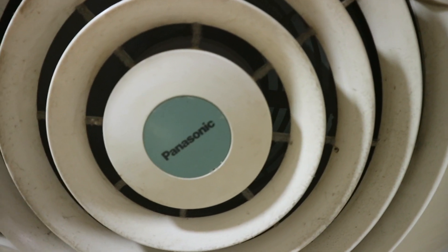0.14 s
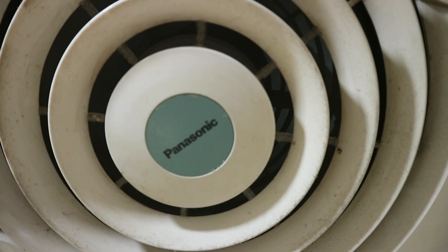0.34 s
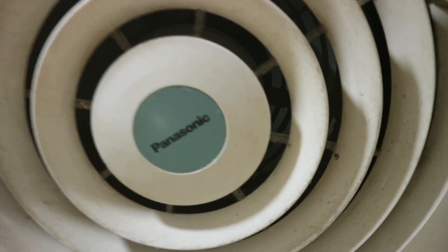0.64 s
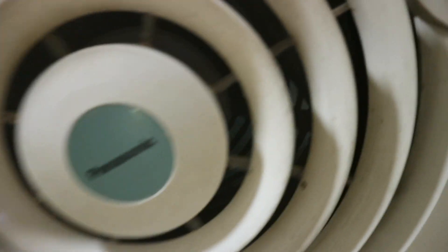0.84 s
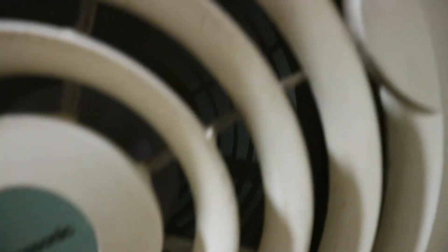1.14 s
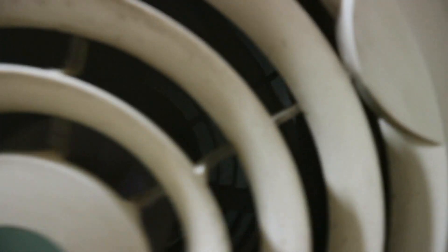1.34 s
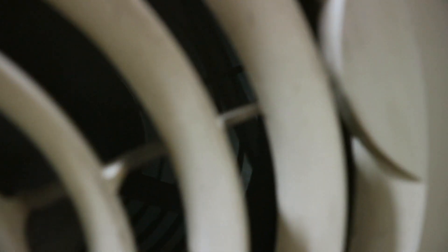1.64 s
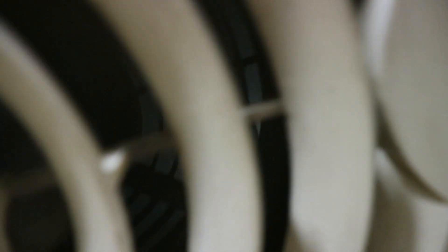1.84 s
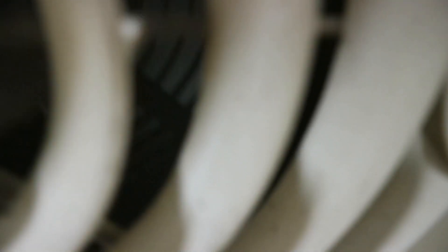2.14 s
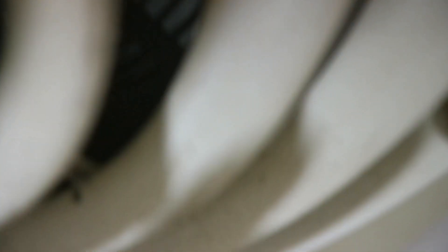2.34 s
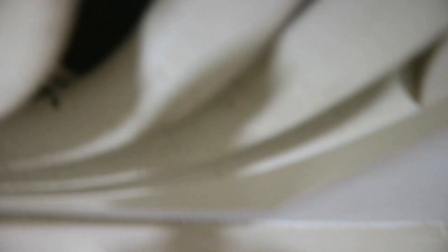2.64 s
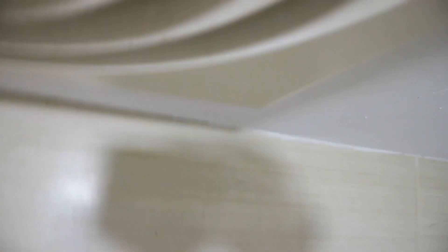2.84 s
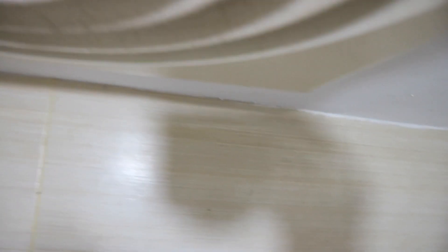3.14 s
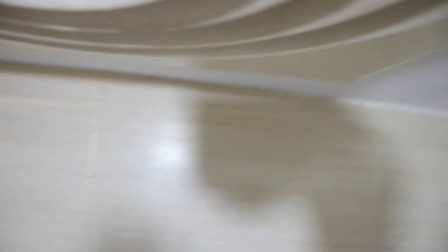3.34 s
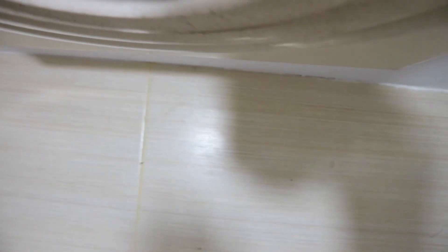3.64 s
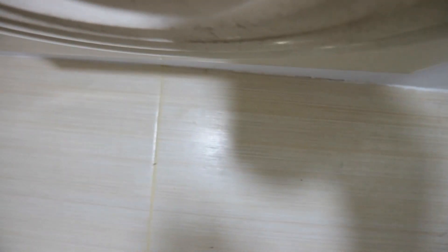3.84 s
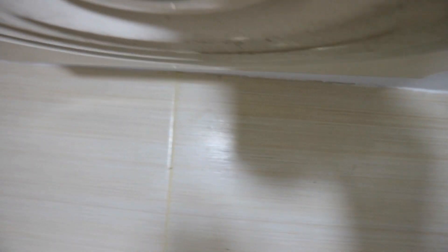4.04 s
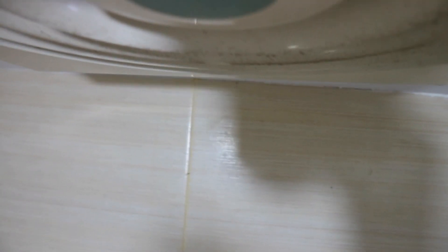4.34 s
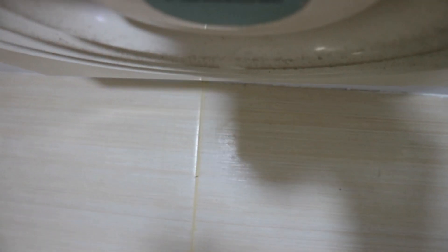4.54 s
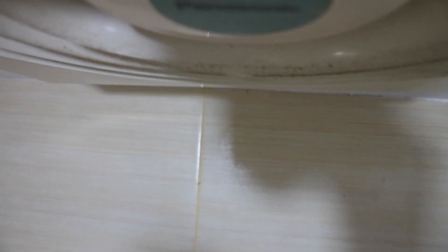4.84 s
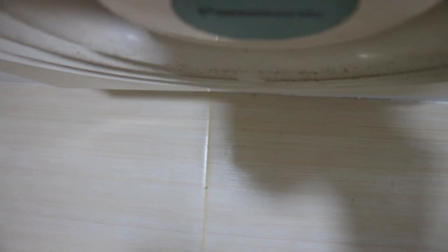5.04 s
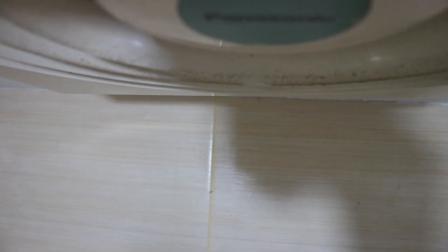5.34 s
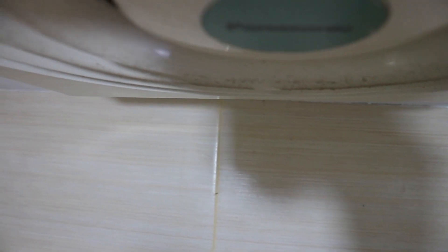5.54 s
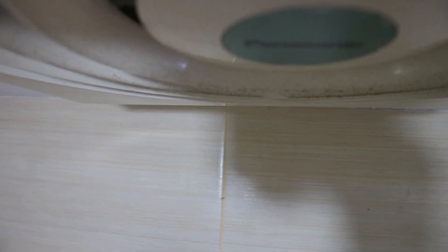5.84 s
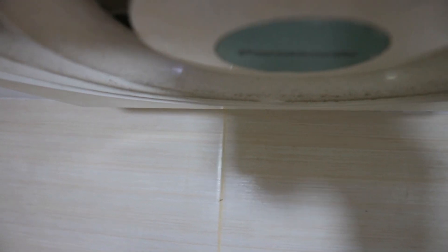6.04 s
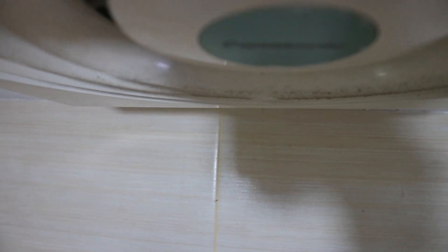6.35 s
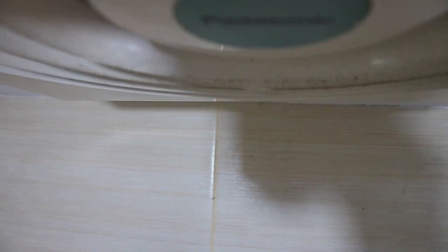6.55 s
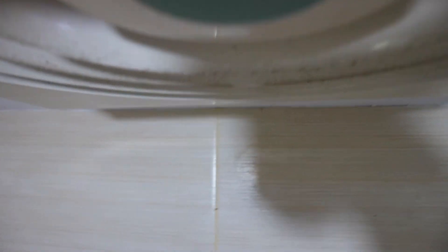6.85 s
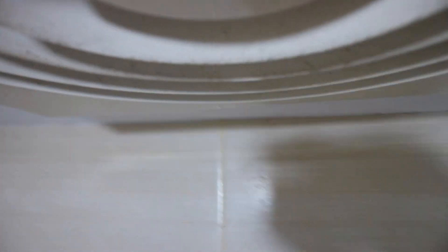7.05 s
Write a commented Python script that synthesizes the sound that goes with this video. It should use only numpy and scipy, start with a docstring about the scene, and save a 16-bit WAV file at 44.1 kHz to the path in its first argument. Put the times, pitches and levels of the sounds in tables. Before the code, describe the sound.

Throbbing motor hum and airy whoosh from a bathroom ventilator, later broken by gusty, bassy draught bumping a moving hand-held microphone.

```python
"""A low hum and drone throb together under rushing air: a ceiling exhaust fan in a tiled bathroom.
The motor hums at twice the mains rate, the impeller drones on multiples of its turning rate,
and noise shaped by the housing makes the air in the grille, a hand's width from a hand-held camera.
Later the microphone slides into the intake draught: eddies, made of short pressure swings, buffet its
two ports. The impeller's third order beats against the hum, and a few faint plastic ticks are heard."""
import sys
import numpy as np
from scipy import signal
from scipy.fft import rfft, irfft
from scipy.io import wavfile

SR = 44100
rng = np.random.default_rng(int(sys.argv[2]) if len(sys.argv) > 2 else 0)


def master_out(mix):
    """Clip the mix to full scale and print it as 16-bit PCM to the path in sys.argv[1]."""
    frames = np.transpose(np.atleast_2d(mix))
    ceiling = np.clip(frames, -1, 1)
    pcm = np.round(ceiling * 32767).astype(np.int16)
    wavfile.write(sys.argv[1], SR, pcm)


N = 317520
TIME = np.arange(N) / SR
SIDES = np.array([[1], [-1]])  # left port, right port

# faint ticks of the handled camera [t/s, relative level/dB, f/Hz]
CAMERA_TICKS = [(.713, -52, 4000), (.738, -53, 7500), (2.569, -42, 4000), (2.672, -48.5, 4700),
                (2.885, -38.5, 3200), (3.755, -58, 6800), (6.068, -50, 4500)]

# the microphone dips into the gusty intake draught twice [t/s, relative eddy level/dB]
DRAUGHT_LEVEL = [(0, -56), (3, -32.5), (3.6, -28), (3.86, -17), (4.0, -25.5), (4.17, -25), (4.28, -19),
                 (4.39, -21), (4.48, -16), (4.61, -22), (4.7, -14.5), (4.8, -25), (4.93, -21.5),
                 (5.02, -20.5), (5.11, -24), (5.22, -21), (5.38, -24), (5.5, -28), (5.95, -38),
                 (6.4, -25.7), (7, -23), (7.2, -31.5)]
# the draught first sweeps from the left port to the right, later meets both almost head-on
# [t/s, lag of the right port/s]
PORT_LAG = [(0, .00075), (5.7, .00075), (6.2, .0001), (7.2, .0001)]
# the air pushes on the whole camera [t/s, buffeting level/dB, deep rumble level/dB]
CAMERA_PUSH = [(0, -51, -44), (1.2, -31, -45), (2, -36, -45), (3.1, -26.5, -40), (3.8, -28.5, -32),
               (4.65, -32.5, -25), (5.2, -31.5, -34), (5.72, -28.5, -42), (5.9, -27, -32), (6.45, -22, -29),
               (6.9, -21.5, -40), (7.2, -23, -47)]
# colour of the buffeting [f/Hz, relative density/dB per Hz]
BUFFET_SPECTRUM = [(20, -22.5), (50, -2.5), (80, -3), (150, 4), (220, 0), (350, -6.5), (550, -17),
                   (1000, -34), (3000, -55.5), (16000, -115)]
# colour of the deep rumble [f/Hz, relative density/dB per Hz]
RUMBLE_SPECTRUM = [(15, -15.5), (38, 0.5), (55, -1), (110, -20.5), (1000, -87.5)]
# single strong eddies that burst on the ports
# [t/s, level/dB, f/Hz, left minus right/dB, lag of the right port/s]
STRONG_EDDIES = [(3.547, -12.5, 220, 1, 0.0), (3.654, -10.5, 180, -1, 0.0), (3.661, -12.0, 390, 1, 0.0),
                 (3.681, -13.0, 260, -5, 0.0), (3.696, -12.0, 300, -1, 0.0), (3.756, -12.5, 440, 2, 0.0),
                 (3.836, -13.5, 350, -1, 0.0003), (3.876, -6.5, 440, -2, 0.0006),
                 (3.882, -13.5, 300, 5, 0.0006), (3.89, -11.5, 350, 1, 0.0006),
                 (3.933, -2.5, 470, -1, 0.0005), (4.048, -11.0, 300, -2, 0.0), (4.169, -11.5, 180, -3, 0.0),
                 (4.266, -12.0, 260, 2, 0.0), (4.448, -11.0, 220, 1, 0.0006),
                 (4.453, -12.0, 300, 1, 0.0006), (4.465, -10.0, 180, -1, 0.0006),
                 (4.48, -9.5, 350, -1, 0.0), (4.486, -9.0, 390, 2, 0.0), (4.531, -10, 320, 0, 0.0006),
                 (4.578, -11.0, 500, 1, 0.0006), (4.616, -11.5, 350, 3, 0.0006),
                 (4.689, -10.5, 300, -8, 0.0006), (4.729, -7.5, 220, -3, 0.0006),
                 (4.754, -13.5, 500, 0, 0.0006), (4.759, -12.0, 350, -5, 0.0006),
                 (4.856, -9.0, 440, 0, 0.0006), (4.887, -9, 420, 4, 0.0005), (4.921, -14.0, 390, 4, 0.0003),
                 (4.986, -11.0, 300, 2, 0.0006), (4.998, -4.5, 360, 2, 0.0006),
                 (5.045, -1.5, 620, -1, 0.0005), (5.048, -5, 430, -1, 0.0006),
                 (5.113, -9.0, 350, -1, 0.0006), (5.176, -12.5, 350, 0, 0.0006),
                 (5.185, -13.0, 440, -2, 0.0006), (5.192, -10.5, 260, 0, 0.0006),
                 (5.235, -12.0, 390, -5, 0.0006), (5.239, -5.5, 400, 2, 0.0006),
                 (5.245, -8, 560, 0, 0.0005), (5.263, -12.5, 300, -1, 0.0006),
                 (5.316, -13.0, 300, 1, 0.0006), (5.363, -12.5, 350, -2, 0.0006),
                 (5.398, -13.0, 260, -3, 0.0006), (5.617, -10, 440, -9, 0.0006),
                 (5.621, -4.5, 460, -7, 0.0003), (5.728, -15.5, 450, -7, 0.0006),
                 (6.141, -10.0, 180, 1, 0.0), (6.323, -8.5, 180, 0, 0.0), (6.362, -11.5, 300, -1, 0.0),
                 (6.445, -8.5, 180, -1, 0.0), (6.477, -7.0, 180, 0, 0.0), (6.64, -9.0, 180, -1, 0.0),
                 (6.673, -7.5, 180, -1, 0.0), (6.732, -6.0, 180, 0, 0.0), (6.779, -10.5, 220, -4, 0.0003),
                 (6.811, -10.0, 220, -1, 0.0), (6.845, -11.0, 260, 2, 0.0), (6.889, -9.0, 220, 1, 0.0),
                 (6.986, -11.5, 220, -6, 0.0003), (6.997, -6.0, 350, 2, 0.0006)]

# air through the grille, louder as the microphone comes near [t/s, relative level/dB]
AIR_LEVEL = [(0, -32.5), (.45, -32.5), (.6, -32.5), (.72, -32.5), (1.2, -32), (1.3, -34.5), (1.85, -34),
             (2.14, -30), (2.26, -31.5), (2.31, -32.5), (2.39, -33.5), (2.56, -31), (2.68, -32.5),
             (2.73, -35), (3.15, -32.5), (3.9, -34), (4.02, -37.5), (4.3, -35.5), (4.7, -36.5), (4.78, -38),
             (5.03, -37.5), (5.1, -41.5), (5.25, -39), (5.9, -37), (6.7, -30.5), (7.2, -34)]
# the aim of the microphone colours and places the air
# [t/s, relative hiss level/dB, lean to the left/dB before scaling for each band]
MICROPHONE_AIM = [(0, -17, 1.5), (.6, -15, 4), (1.2, -17, 5.5), (1.9, -17, 7), (3.2, -22, 3.5),
                  (5.6, -22, 3.5), (6.1, -17.5, 3), (6.8, -21.5, 4.5), (7.2, -21, 4)]
# broad colour of the rushing air [f/Hz, relative density/dB per Hz]
AIR_SPECTRUM = [(20, -3.5), (45, 6.5), (70, 18.5), (130, 15.5), (170, 9.5), (380, 5.5), (550, 4.5),
                (850, -0.2), (1800, -4), (2600, -11), (4000, -19), (7000, -31.5), (10000, -41.5),
                (15000, -60)]
# resonances of duct, housing and grille gaps [f/Hz, width/Hz, lift/dB]
HOUSING_RESONANCES = [(71.5, 4.9, 11), (296, 26, 3.5), (392, 3, 3.5), (1090, 130, -0.5), (1215, 88, -2.5),
                      (1423, 350, 2.5), (3180, 570, 0.5)]
# short waves reach the two ports out of step [f/Hz, side minus mid/dB]
STEREO_WIDTH = [(60, -20), (200, -19.5), (500, -17.5), (1100, -13), (1600, -12.5), (2600, -9.5),
                (4000, -3.5), (8000, 1.5), (13000, 12)]
# share of the frontal colour, as the microphone moves aside [t/s, share/0-1]
FRONT_SHARE = [(0, 0.82), (1.25, 0.95), (2, 0.35), (3.2, 0), (7.2, 0)]
# hollow housing notes straight in front of the grille, and the gaps between them [f/Hz, width/Hz, lift/dB]
FRONT_RESONANCES = [(228, 30, -3.5), (287, 16, 8), (323, 12, 5), (443, 24, -6), (530, 26, -5),
                    (560, 16, 2.5), (880, 90, -1.5), (1080, 170, 4.5), (1620, 130, 1.5)]
# share of the sidelong colour, between the rim of the grille and the wall [t/s, share/0-1]
RIM_SHARE = [(0, 0), (3.3, 0), (4.3, 0.6), (5.1, 1), (5.9, 1), (6.6, 0.8), (7.2, 0)]
# there reflections cut a sharp edge into the rush [f/Hz, width/Hz, lift/dB]
RIM_RESONANCES = [(1700, 220, 3.2), (1850, 170, -7.5), (2650, 140, 2.5), (3130, 160, 2), (4200, 2200, 1.5)]

# the impeller slows a little while the intake is partly covered [t/s, turns per second]
IMPELLER_SPEED = [(0, 32.75), (2.6, 32.4), (3.1, 32), (5.05, 32), (5.25, 32.18), (5.95, 32.19),
                  (6.25, 32.5), (7.2, 32.6)]
# tones swell and fade with the microphone's place [t/s, motor hum level/dB, third impeller order level/dB]
MAIN_TONES = [(0, -20, -19), (.8, -18, -42.5), (2.4, -17, -52), (3.3, -18, -19), (3.7, -26, -17),
              (4.5, -20, -22), (5.3, -26.5, -26.5), (5.55, -34, -26.5), (6.2, -22.5, -27.5),
              (6.7, -20, -23.5), (7.2, -25.5, -24)]
# the second order, reinforced by the duct, is loudest right under the slots [t/s, level/dB]
DRONE_LEVEL = [(0, -20), (.42, -28.5), (.55, -19.5), (.7, -24), (.82, -34), (.94, -19), (1.04, -20),
               (1.14, -15), (1.62, -13.5), (2.08, -18), (2.22, -13), (2.45, -18.5), (3.3, -17.5),
               (3.45, -23), (3.8, -22.5), (4.1, -30.5), (4.6, -36), (4.73, -25), (5.25, -23.5),
               (5.5, -35.5), (6.15, -36), (6.42, -21), (7.2, -25)]
# the sixth order sings out here and there [t/s, level/dB]
SIXTH_LEVEL = [(0, -35), (.6, -37), (.95, -25), (1.3, -36), (1.7, -38), (2.3, -33), (2.7, -31), (3.2, -29),
               (3.7, -34), (4.4, -32), (5, -40.5), (7.2, -41)]
# weaker impeller orders [multiple of the turning rate, relative level/dB]
WEAK_ORDERS = [(4, -30), (5, -43), (8, -38.5), (10, -44), (12, -41.5), (13, -44)]


def amp(db):
    """Turn decibels into gain."""
    return 10 ** (np.asarray(db) / 20)


def curves(table):
    """Join the rows of a table by straight lines over time, one curve for each column after t/s."""
    s, *columns = np.transpose(table)
    return [np.interp(TIME, s, column) for column in columns]


def unit(x):
    """Scale to an rms (average strength) of 1."""
    return x / np.sqrt(np.mean(x ** 2))


def bins():
    """Frequency in Hz of every spectral bin, kept above zero."""
    return np.maximum(np.arange(N // 2 + 1) * SR / N, 1)


def colour(points):
    """Gain per bin, drawn through (f/Hz, level/dB) points on a log-frequency axis."""
    hz, db = np.transpose(points)
    return amp(np.interp(np.log(bins()), np.log(hz), db))


def lift(resonances):
    """Gain per bin from peaks and dips of (f/Hz, width/Hz, lift/dB)."""
    hz = bins()
    lift_db = sum(db / (1 + (2 * (hz - centre) / width) ** 2) for centre, width, db in resonances)
    return amp(lift_db)


def noise(gain):
    """Random noise of rms 1 with the given gain per bin."""
    return unit(irfft(rfft(rng.standard_normal(N)) * gain, N))


def walk(rate):
    """Smooth random wandering of spread 1 that changes about rate times a second."""
    return noise(np.exp(-(bins() / rate) ** 2))


def add(out, s, sound):
    """Mix a sound in, centred on time s and kept inside the scene."""
    start = int(np.clip(s * SR - sound.shape[1] / 2, 0, N - sound.shape[1]))
    out[:, start:start + sound.shape[1]] += sound


def tiles(x, wet_db=-17, t60_s=0.71):
    """Hard walls return a short dense echo, which ripples the colour of the air noise."""
    t = TIME[:SR // 4]
    echo = rng.standard_normal(len(t)) * amp(-60 * t / t60_s)
    echo = echo / np.sqrt(np.sum(echo ** 2))
    return x + amp(wet_db) * signal.fftconvolve(x, echo[None], axes=1)[:, :N]


def ticks(decay_s=0.0019, attack_s=0.0011):
    """Tiny soft plastic ticks: short puffs of noise through one broad resonance that dies at once."""
    out = np.zeros((2, N))
    t = np.arange(-1323, 1323) / SR
    envelope = np.exp(-np.abs(t) / np.where(t < 0, attack_s, decay_s))
    for s, db, hz in CAMERA_TICKS:
        band = signal.butter(2, [hz / 1.5, hz * 1.5], "band", fs=SR, output="sos")
        blow = rng.standard_normal((2, len(t))) * envelope
        ring = signal.sosfilt(band, blow)
        add(out, s, amp(db + 15.5) * ring / np.abs(ring).max())
    return out


def pop(hz, lag_s, order=5):
    """One eddy: a short swing of pressure about the pitch hz, meeting the left port lag_s before the right."""
    t = np.arange(-662, 662) / SR + SIDES * lag_s / 2
    length_s = (order - .5) / (2 * np.pi * hz)
    random_phase = np.exp(2j * np.pi * rng.random())
    return np.real(random_phase / (1 - 1j * t / length_s) ** order)


def eddies(hz, octaves, scatter_db, lean_db, lag_scatter_s, count):
    """A stream of lesser eddies of rms 1, each with its own pitch, strength and path over the ports."""
    out = np.zeros((2, N))
    lag_s, = curves(PORT_LAG)
    chances = rng.uniform(-1.006, 1, (count, 5))
    for k, (when, strength, pitch, lean, path) in enumerate(chances):
        i = int(np.clip((k + when) / count * N, 0, N - 1))
        gain = amp(scatter_db * strength + lean_db * SIDES * lean)
        eddy = pop(hz * 2 ** (octaves * pitch), lag_s[i] + lag_scatter_s * path)
        add(out, i / SR, gain * eddy)
    return unit(out)


def draught(small_db=-11.3, large_db=-3.5, buffet_gust_db=3.5, right_db=.8, gust_db=2, gust_hz=18):
    """In gusts, small eddies patter and larger ones bump the ports; the largest push the whole camera."""
    eddy_db, = curves(DRAUGHT_LEVEL)
    buffet_db, rumble_db = curves(CAMERA_PUSH)
    small = eddies(hz=360, octaves=.5, scatter_db=5, lean_db=5, lag_scatter_s=.0007, count=640)
    large = eddies(hz=185, octaves=.55, scatter_db=6, lean_db=6, lag_scatter_s=.0018, count=480)
    buffet_gusts = amp(buffet_gust_db * np.tanh(walk(41)))
    buffet = unit(noise(colour(BUFFET_SPECTRUM)) * buffet_gusts)
    # the right port lies deeper in the stream: left down, right up by right_db
    gusts = amp(eddy_db + gust_db * np.tanh(walk(gust_hz)) - right_db * SIDES)
    patter = (amp(small_db) * small + amp(large_db) * large) * gusts
    rumble = noise(colour(RUMBLE_SPECTRUM)) * amp(rumble_db)
    return patter + buffet * amp(buffet_db) + rumble


def bursts():
    """The strongest eddies thud and pop on the ports, often in quick twos and threes."""
    out = np.zeros((2, N))
    for s, db, hz, pan_db, lag_s in STRONG_EDDIES:
        add(out, s, amp(db + SIDES * pan_db / 2) * pop(hz, lag_s))
    return out


def grille(air_db=-1, hiss_lift_db=18, hiss_hz=3500, flicker_db=1.13, swirl=0.14):
    """Turbulent air rings the housing; the treble beams from the slots and dulls off to the side."""
    level_db, = curves(AIR_LEVEL)
    hiss_db, pan_db = curves(MICROPHONE_AIM)
    speed, = curves(IMPELLER_SPEED)
    hz = bins()
    shape = colour(AIR_SPECTRUM) * lift(HOUSING_RESONANCES)
    mid, side = rfft(rng.standard_normal((2, N)))
    ports = shape * (mid + SIDES * side * colour(STEREO_WIDTH))
    # the strength of the 1000-2500 Hz band sets the reference level
    rush_band = (hz > 1000) & (hz < 2500)
    ports = ports / np.std(irfft(shape * mid * rush_band, N))
    # three bands: body below 650 Hz, hiss above hiss_hz, rush between
    low = 1 / (1 + (hz / 650) ** 4)
    high = 1 / (1 + (hiss_hz / hz) ** 3)
    body = irfft(ports * low, N)
    rush = irfft(ports * (1 - low) * (1 - high), N)
    hiss = irfft(ports * (1 - low) * high, N)
    body = body * amp(level_db + 1.3 * walk(3))
    rush = rush * amp(level_db + flicker_db * walk(28) + SIDES * pan_db * 0.32)
    hiss = hiss * amp(level_db + hiss_db + hiss_lift_db + flicker_db * walk(14) + SIDES * pan_db * 0.17)
    # the flow pulses twice a turn
    turns = np.cumsum(speed) / SR
    pulse = 1 + swirl * np.cos(2 * 2 * np.pi * turns)
    return amp(air_db) * (body + (rush + hiss) * pulse)


def tint(air, place, resonances):
    """Resonances that come and go with the place of the microphone."""
    share, = curves(place)
    change = irfft(rfft(air) * (lift(resonances) - 1), N)
    return air + share * change


def motor(hum_hz=100, in_step_s=3.78, overtone_db=-1, double_db=-23):
    """Magnetic hum and impeller orders; the third order lies just under the hum and throbs against it."""
    speed, = curves(IMPELLER_SPEED)
    hum_db, third_db = curves(MAIN_TONES)
    drone_db = curves(DRONE_LEVEL)[0] + 1.5 * walk(18)
    sixth_db = curves(SIXTH_LEVEL)[0] + 1.8 * walk(8)
    turns = np.cumsum(speed) / SR
    # hum and impeller are both at a crest at in_step_s
    angle = 2 * np.pi * (turns - np.interp(in_step_s, TIME, turns))
    field = 2 * np.pi * hum_hz * (TIME - in_step_s)
    hum_wave = np.cos(field) + amp(double_db) * np.cos(2 * field)
    hum = amp(hum_db + 2.5 * walk(1.8)) * hum_wave
    third = amp(third_db) * np.cos(3 * angle)
    # uneven inflow makes the load on the blades, and so these orders, waver in level and phase (radians)
    drone = amp(drone_db) * np.cos(2 * angle + 0.22 * walk(9.5))
    sixth = amp(sixth_db) * np.cos(6 * angle + .55 * walk(7))
    overtones = np.zeros(N)
    for order, db in WEAK_ORDERS:
        overtones += amp(db + 2.14 * walk(4.8)) * np.cos(order * angle + .9 * walk(4.1))
    # they fade with the main tones, by half as many dB, where the microphone is turned away
    main_db = np.maximum(hum_db, third_db)
    facing = amp(overtone_db + .5 * (main_db - main_db.max()))
    # root two gives a steady tone of gain 1 an rms of 1
    return np.sqrt(2) * (hum + third + drone + sixth + facing * overtones)


def scene():
    """The fan in its tiled room, and the air that it draws past the microphone."""
    front_air = tint(grille(), FRONT_SHARE, FRONT_RESONANCES)
    air = tint(front_air, RIM_SHARE, RIM_RESONANCES)
    return motor() + tiles(air) + draught() + bursts() + ticks()


def record(dry, mono_hz=60, thin_hz=12, top_hz=15700):
    """The camera merges the bass of its two ports, thins the deepest rumble and cuts the top."""
    mid = dry.mean(axis=0)
    merged = mid + irfft(rfft(dry - mid) / (1 + (mono_hz / bins()) ** 4), N)
    thinned = signal.sosfilt(signal.butter(1, thin_hz, "high", fs=SR, output="sos"), merged)
    return signal.sosfilt(signal.ellip(8, .2, 70, top_hz, fs=SR, output="sos"), thinned)


dry = scene()
out = record(dry)
master_out(out)
```